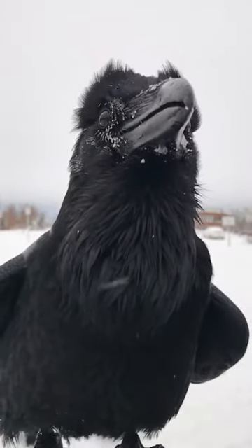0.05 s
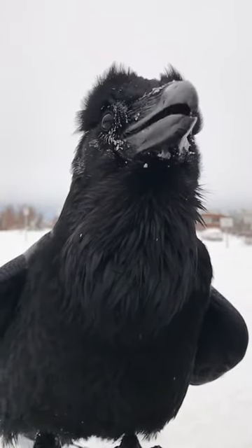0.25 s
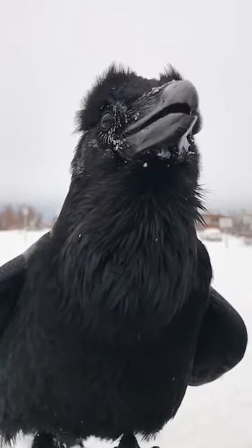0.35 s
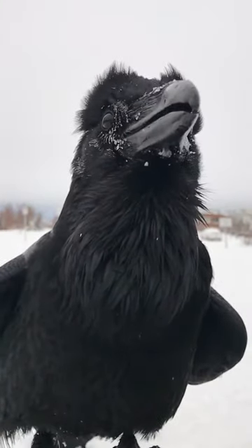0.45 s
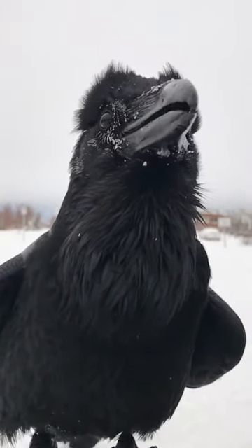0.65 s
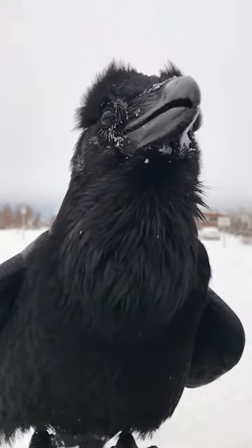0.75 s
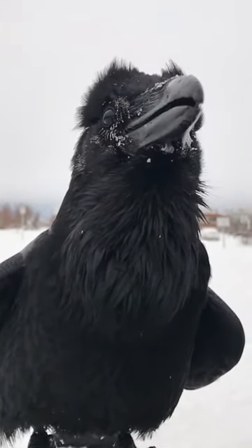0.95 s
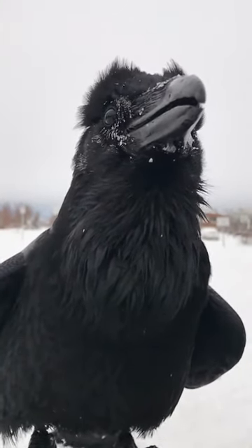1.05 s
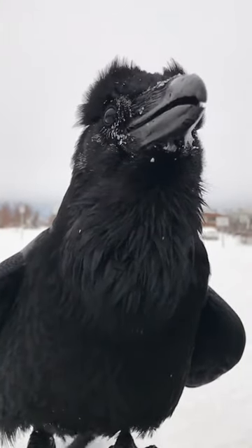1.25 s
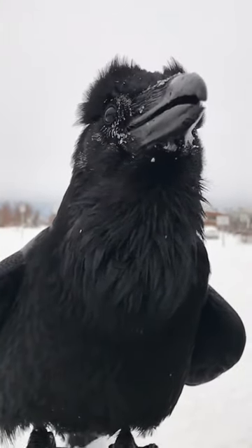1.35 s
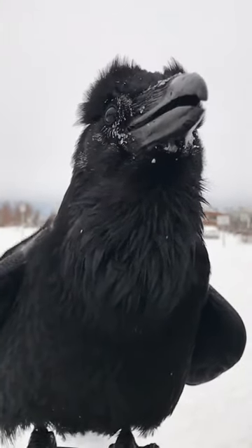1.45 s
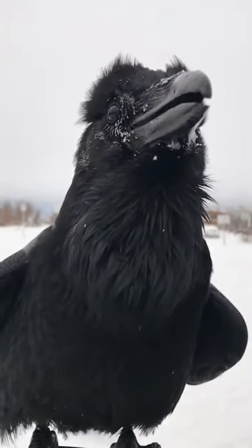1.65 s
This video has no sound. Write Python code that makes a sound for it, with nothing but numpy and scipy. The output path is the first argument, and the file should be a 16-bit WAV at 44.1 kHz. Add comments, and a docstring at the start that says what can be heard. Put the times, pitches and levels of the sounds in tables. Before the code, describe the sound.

Five raspy raven croaks in quick succession, close up, with light wind behind.

```python
"""Light wind and a distant low hum on open snow, with a few soft bumps on the microphone.
Close by, a raven gives five harsh croaks. Its syrinx buzzes with a lurching pitch, cracks now and then,
and sags at the end of each call; the throat rings near 1.5 kHz.
The ground scatters each croak, and a faint echo comes back from far away."""
import sys
import numpy as np
from scipy import signal
from scipy.fft import rfft, irfft
from scipy.io import wavfile
from scipy.ndimage import uniform_filter1d

SR = 44100
rng = np.random.default_rng(int(sys.argv[2]) if len(sys.argv) > 2 else 0)


def store_pcm(level_fs):
    """Save levels as 16-bit WAV."""
    pcm = np.round(np.clip(level_fs, -1, 1) * 32767).astype(np.int16)
    wavfile.write(sys.argv[1], SR, np.atleast_2d(pcm).T)


N = 74970
BAND_LIMIT_HZ = 16000


def amp(db):
    """Decibels to gain."""
    return 10 ** (np.asarray(db) / 20)


def unit(x):
    """Scale to rms 1."""
    return x / np.sqrt(np.mean(x ** 2) + 1e-20)


def gain_at(points, hz):
    """Gain of an (f/Hz, level/dB) curve, interpolated in log frequency."""
    f, db = np.transpose(points)
    return amp(np.interp(np.log(hz + 1), np.log(f + 1), db))


def add(mix, start_s, sound):
    """Mix a sound in at start_s."""
    part = mix[max(round(start_s * SR), 0):][:len(sound)]
    part += sound[:len(part)]


def colour(x, points, size=2048):
    """Minimum-phase filter from an (f/Hz, level/dB) curve."""
    cepstrum = irfft(np.log(gain_at(points, np.fft.rfftfreq(size, 1 / SR))))
    cepstrum[1:size // 2] *= 2
    cepstrum[size // 2 + 1:] = 0
    return signal.fftconvolve(x, irfft(np.exp(rfft(cepstrum))))[:len(x)]


def band_noise(n, hz, sigma_hz):
    """Noise in a Gaussian band, rms about 1."""
    size = 2 ** int(np.ceil(np.log2(n)))
    f = np.fft.rfftfreq(size, 1 / SR)
    band = np.exp(-.5 * ((f - hz) / sigma_hz) ** 2)
    return unit(irfft(rfft(rng.standard_normal(size)) * band))[:n]


def smooth(x, window_s):
    """Running mean, applied twice."""
    size = max(round(window_s * SR), 1)
    return uniform_filter1d(uniform_filter1d(x, size, mode="nearest"), size, mode="nearest")


# Wind spectrum: f/Hz, relative level/dB
WIND_SPECTRUM = [(15, -24.5), (45, 2.5), (120, -6.5), (250, -7.5), (500, -15.5), (1500, -16), (2100, -25.5),
                 (3500, -34), (6000, -38.5), (16000, -45.5)]
# Hiss swells: t/s, middle gain/dB, treble gain/dB
HISS_SWELLS = [(0.034, 0, 12), (.06, 2.5, -5), (0.221, 3, 0.5), (.32, -3, -6), (1.251, -2.5, -1),
               (1.5, -3, 1), (1.7, 3, 6.5)]


def wind(gain_db=-43):
    """Low rumble and a faint hiss whose middle and treble swell and ebb."""
    f, t = np.fft.rfftfreq(N, 1 / SR), np.arange(N) / SR
    noise = irfft(rfft(rng.standard_normal(N)) * gain_at(WIND_SPECTRUM, f), N)
    spectrum = rfft(unit(noise))
    low, high = 1 / (1 + (f / 350) ** 2), f ** 2 / (f ** 2 + 4500 ** 2)
    rumble, middle, treble = (irfft(spectrum * share, N) for share in (low, 1 - low - high, high))
    times_s, middle_db, treble_db = np.transpose(HISS_SWELLS)
    middle *= amp(np.interp(t, times_s, middle_db))
    treble *= amp(np.interp(t, times_s, treble_db))
    return amp(gain_db) * (rumble + middle + treble)


# Hum bands: f/Hz, width/Hz, level/dB
HUM_BANDS = [(49.3, 2, -57), (148.7, 12, -51), (175, 49, -53)]


def hum():
    """Distant low tones, wavering as narrow bands of noise."""
    return sum(amp(db) * band_noise(N, hz, width_hz / 2) for hz, width_hz, db in HUM_BANDS)


# Bumps: t/s, Gaussian sigma/s, f/Hz, level/dB
MIC_BUMPS = [(.08, 0.0083, 109, -36.5), (0.261, 0.0018, 160, -29.5), (0.386, 0.0012, 216, -26.5),
             (0.506, 0.0073, 81.4, -38.5)]


def bumps():
    """Short, dull pushes on the microphone."""
    t = np.arange(N) / SR
    sound = np.zeros(N)
    for at_s, sigma_s, hz, db in MIC_BUMPS:
        envelope = amp(db) * np.exp(-.5 * ((t - at_s) / sigma_s) ** 2)
        sound += envelope * np.sin(2 * np.pi * (hz * (t - at_s) + rng.random()))
    return sound


# Hard cracks: t/s, strength (1 = full crack)
HARD_CRACKS = [(0.2145, 1.5), (0.291, 1.3), (0.472, .8), (0.662, .9), (1.331, .7), (1.3515, .9)]


def cracking(t, hz, full_octaves_per_s=115, lag_s=.002, width_s=.004):
    """How far the voice breaks into a rattle: just after quick pitch drops, and at the listed times."""
    drop = np.clip(-np.gradient(np.log2(hz), t) / full_octaves_per_s, 0, 1)
    hard = sum(strength * np.exp(-((t - at_s) / width_s) ** 2) for at_s, strength in HARD_CRACKS)
    return np.maximum(np.interp(t - lag_s, t, drop), hard)


def brightness(t, hz, crack, open_s=.0035, close_s=.0055, press_db_per_octave=17, crack_db=6):
    """Overtone and rasp gain: opens late, closes early, flickers, rises in pitch dips and cracks."""
    opening = np.clip(np.minimum((t - t[0]) / open_s, (t[-1] - t) / close_s), .1, 1) ** 2
    dip_octaves = np.log2(smooth(hz, window_s=.014) / hz)
    flicker_db = 1.6 * band_noise(len(t), 0, sigma_hz=110)
    return opening * amp(press_db_per_octave * dip_octaves + crack_db * crack + flicker_db)


THROAT_HZ = 1330  # main resonance


def buzz(hz, cycles, overtone_gain, hoarseness, fray_hz=7200, flutter_hz=85):
    """Harmonics of the syrinx pulses; above the throat resonance they fray into flutter."""
    n, k = len(hz), np.arange(1, 36)[:, None]
    overtone = np.clip(np.log2(k * hz / THROAT_HZ), 0, 1)
    fray = .8 * np.minimum((hoarseness * k * hz / fray_hz) ** 2, 1) * overtone
    flutter = np.array([band_noise(n, 0, flutter_hz) + 1j * band_noise(n, 0, flutter_hz) for _ in k])
    gain = overtone_gain ** overtone * (k * hz < BAND_LIMIT_HZ)
    waver = np.sqrt(1 - fray) + np.sqrt(fray / 2) * flutter
    return unit((gain * waver * np.exp(2j * np.pi * k * cycles)).real.sum(0))


def puffs(cycles, tilt=1.05):
    """Bright noise of air escaping in one puff per cycle."""
    air = irfft(rfft(rng.standard_normal(N)) * np.fft.rfftfreq(N) ** tilt, N)[:len(cycles)]
    return unit(air * (2.7 + np.exp(-(cycles % 1))))


def syrinx(t, hz, grit_db, slack_hz=680, rasp_db=-9, crack_rasp_db=4):
    """Jittery buzz and air rasp; below slack_hz the membranes slacken and the voice grows hoarse."""
    crack = cracking(t, hz)
    slack = np.minimum(np.maximum(slack_hz / hz, 1) ** 3, 4)
    bright = brightness(t, hz, crack)
    jitter_depth = .0022 * (slack ** 2 + amp(grit_db) - 1) + .05 * crack ** 2
    jitter = jitter_depth * band_noise(len(t), 0, sigma_hz=350)
    cycles = np.cumsum(hz * (1 + jitter)) / SR
    tone = buzz(hz, cycles, overtone_gain=bright / np.sqrt(slack), hoarseness=amp(grit_db) * slack)
    rasp_gain = amp(rasp_db + grit_db / 2) * slack + amp(crack_rasp_db) * crack
    return tone + bright * rasp_gain * puffs(cycles)


# Throat and open beak response: f/Hz, level/dB
THROAT_RESPONSE = [(300, -17.5), (560, -16), (720, -19), (950, -8.5), (1200, -2), (1400, 3), (1550, 3.5),
                   (1800, -3), (2100, -15.5), (2350, -14.5), (2700, -23), (3100, -19), (3700, -24),
                   (4400, -24.5), (5200, -34.5), (6200, -39.5), (8000, -51.5), (12000, -57.5), (15000, -63)]
# Timbre bands: f/Hz
TIMBRE_HZ = [700, 3000, 5500, 10000]
# Voice per croak: [level/dB at each TIMBRE_HZ], [beak peaks and dips: f/Hz, level/dB]
CROAK_VOICES = [([-2, -1.5, -7.5, -8.5], [(1880, 4), (2500, 5.5), (3400, 7), (6300, 6)]),
                ([-5, -3, 2, -4.5], [(2080, -15), (3050, 8.5), (4700, 1.5), (6050, 1)]), ([2, 2, -0.5, 8.5],
                [(2030, -5), (3780, 6), (4750, -6.5), (5200, 9.5)]), ([2, -2, 0.5, 5.5], [(3050, 6.5),
                (4580, 1.5), (6120, 4.5), (7500, 6)]), ([5, -9, 9, 3], [(1950, 6.5), (3300, 14), (3770, 7),
                (8350, 13.5)])]


def throat(drive, index, treble_hz=5400, dull_db=-6, ring_width_hz=240):
    """Throat and beak resonate; the treble falls over the call as the effort eases."""
    timbre_db, beak = CROAK_VOICES[index]
    treble = signal.sosfiltfilt(signal.butter(2, treble_hz, "high", fs=SR, output="sos"), drive)
    drive = drive + (amp(dull_db * np.linspace(-.5, .5, len(drive))) - 1) * treble
    for ring_hz, ring_db in beak:
        ring = signal.lfilter(*signal.iirpeak(ring_hz, ring_hz / ring_width_hz, SR), drive)
        drive += (amp(ring_db) - 1) * ring
    timbre = sorted([(THROAT_HZ, 0), *zip(TIMBRE_HZ, timbre_db)])
    return colour(colour(drive, THROAT_RESPONSE), timbre)


# Pitch and level contour per croak: t/s, f/Hz, level/dB
CONTOUR_1 = [(0.202, 700, -38), (0.204, 780, -16.7), (0.208, 829, -19.8), (0.211, 686, -19.9),
             (0.215, 586, -14.4), (0.222, 673, -14.5), (0.2269, 687, -16.1), (0.2339, 834, -15.0),
             (0.2399, 826, -16.8), (0.2459, 610, -17.7), (0.2614, 678, -21.1), (0.2768, 549, -23.8),
             (0.2843, 497, -28.6), (0.2923, 403, -27.8), (0.2988, 351, -40.0)]
CONTOUR_2 = [(0.3915, 685, -42), (0.3935, 756, -18.5), (0.395, 700, -14.5), (0.399, 578, -16.9),
             (0.4149, 728, -9.5), (0.4254, 786, -11.1), (0.4329, 681, -12.3), (0.4409, 708, -12.1),
             (0.4484, 710, -15.2), (0.4598, 585, -21.1), (0.4683, 498, -20.4), (0.4778, 387, -25.3),
             (0.4858, 387, -41.6)]
CONTOUR_3 = [(0.614, 587, -40.6), (0.62, 635, -22.6), (0.624, 790, -12.8), (0.631, 621, -19.7),
             (0.6344, 707, -16.7), (0.6379, 724, -10.2), (0.6499, 768, -9.1), (0.6544, 818, -12.1),
             (0.6609, 617, -23.4), (0.6649, 726, -11.1), (0.6689, 763, -9.6), (0.684, 810, -11.4),
             (0.6888, 745, -10.6), (0.71, 822, -12.3), (0.7145, 735, -10.8), (0.7365, 787, -13.3),
             (0.7415, 668, -11.8), (0.7592, 752, -13), (0.7637, 704, -13.9), (0.7681, 603, -19.0),
             (0.7736, 628, -19.3), (0.7846, 552, -22.6), (0.7936, 435, -25.3), (0.7976, 435, -35.9)]
CONTOUR_4 = [(0.979, 479, -42.5), (0.9865, 689, -12.7), (0.9924, 641, -12.1), (0.9989, 739, -9.4),
             (1.0054, 782, -9.4), (1.0139, 781, -9.6), (1.0194, 733, -11.2), (1.0244, 761, -10.3),
             (1.0628, 761, -11.9), (1.0783, 685, -14.3), (1.0827, 613, -19.7), (1.0937, 656, -20.9),
             (1.0972, 609, -27.0), (1.1047, 564, -21.3), (1.1127, 647, -16.9), (1.1212, 659, -16.3),
             (1.135, 575, -20.3), (1.1481, 453, -23.5), (1.1566, 443, -42.2)]
CONTOUR_5 = [(1.3192, 648, -32), (1.3205, 656, -16.5), (1.323, 671, -15.6), (1.328, 581, -19.0),
             (1.332, 677, -14.2), (1.3449, 725, -8.5), (1.3484, 777, -9.3), (1.3504, 815, -16.9),
             (1.3539, 703, -21.3), (1.3587, 745, -8.7), (1.3745, 756, -9.6), (1.3785, 640, -22.5),
             (1.3853, 662, -17.4), (1.3968, 652, -21.4), (1.4023, 571, -23.5), (1.4143, 508, -20.4),
             (1.4287, 349, -31.8), (1.4347, 365, -43.1)]
# Extra hoarseness per croak: gain/dB
CROAK_GRIT_DB = [4, 7, 1, 2, 4]


def raven(fade_s=.00065):
    """Five croaks: the syrinx drives the throat along each contour."""
    mix = np.zeros(N)
    for index, contour in enumerate((CONTOUR_1, CONTOUR_2, CONTOUR_3, CONTOUR_4, CONTOUR_5)):
        times_s, pitch_hz, level_db = np.transpose(contour)
        t = np.arange(times_s[0], times_s[-1], 1 / SR)
        hz = smooth(np.interp(t, times_s, pitch_hz), window_s=.0022)
        croak = throat(syrinx(t, hz, CROAK_GRIT_DB[index]), index)
        croak /= np.sqrt(smooth(croak ** 2, window_s=.0035) + 1e-12)  # the contour alone sets the level
        fade = np.clip(np.minimum(t - t[0], t[-1] - t) / fade_s, 0, 1)
        add(mix, times_s[0], croak * fade * amp(np.interp(t, times_s, level_db)))
    return mix


# Filter on all reflections: f/Hz, level/dB
REFLECTION_COLOUR = [(900, -18), (1500, -8.5), (3400, 5), (9000, -1.5)]


def snowfield(x, scatter_decay_s=.006, echo_delay_s=.143, echo_blur_s=.009, tail_t60_s=.67):
    """Scatter from the ground nearby, one blurred far echo and a very thin tail."""
    t = np.arange(N) / SR
    scatter = np.exp(-t / scatter_decay_s)
    echo = np.exp(-abs(t - echo_delay_s) / echo_blur_s)
    tail = amp(-60 * t / tail_t60_s)
    paths = [(scatter, -23), (echo, -37.5), (tail, -49)]  # envelope, gain/dB
    response = sum(amp(db) * unit(shape * rng.standard_normal(N)) for shape, db in paths) / np.sqrt(N)
    return colour(signal.fftconvolve(x, response)[:N], REFLECTION_COLOUR)


def scene():
    """Background, raven and reflections, in mono."""
    croaks = raven()
    reflections = snowfield(croaks)
    return (wind() + hum() + bumps() + croaks + reflections)[None]


def record(dry):
    """Low-pass at the band limit."""
    lowpass = signal.firwin(511, BAND_LIMIT_HZ, window=("kaiser", 9), fs=SR)
    return signal.oaconvolve(dry, lowpass[None], "same")


dry = scene()
out = record(dry)
store_pcm(out)
```